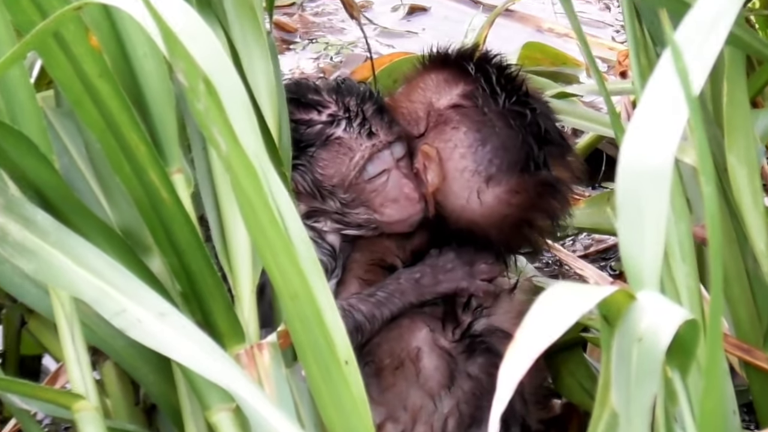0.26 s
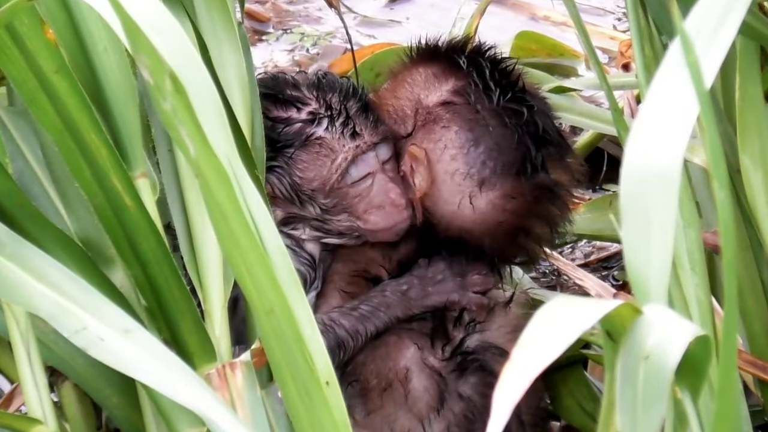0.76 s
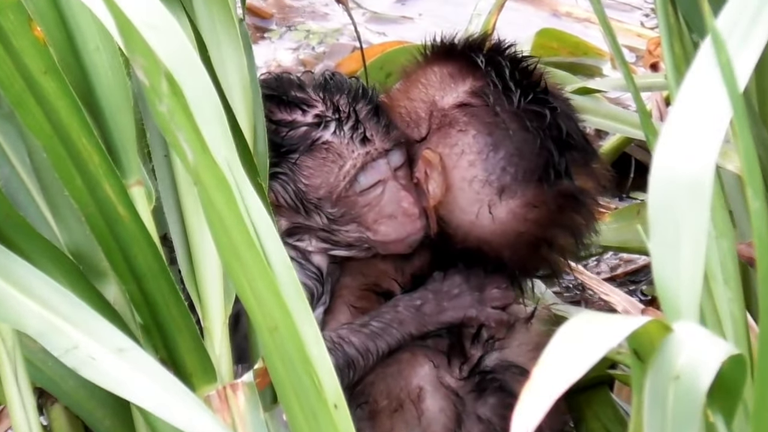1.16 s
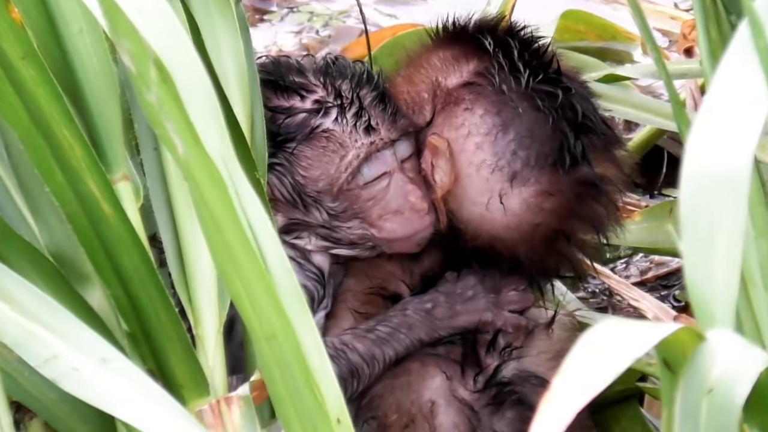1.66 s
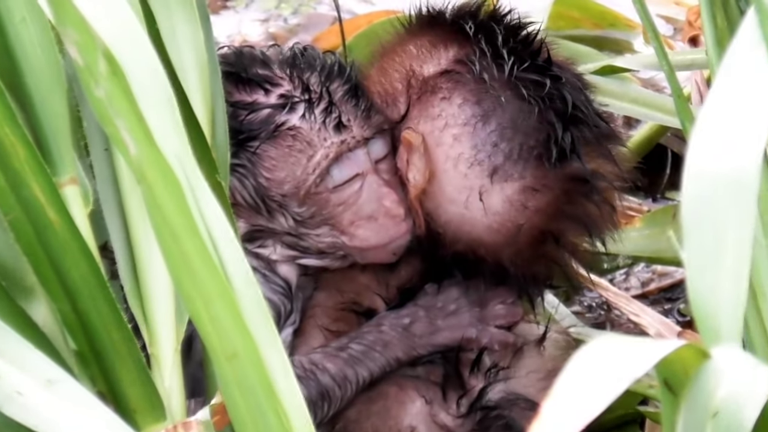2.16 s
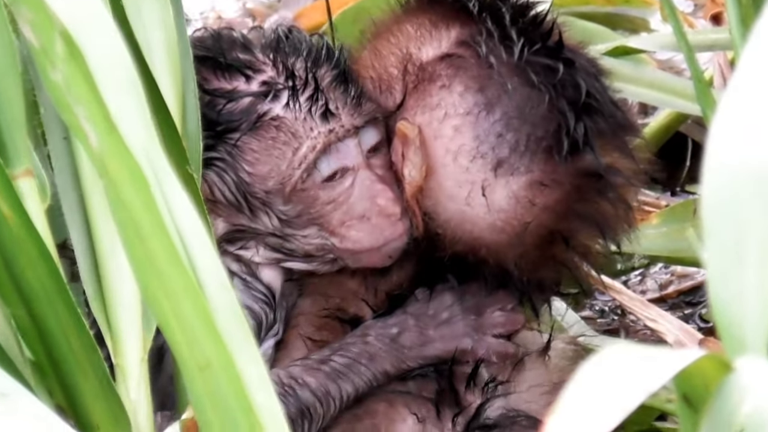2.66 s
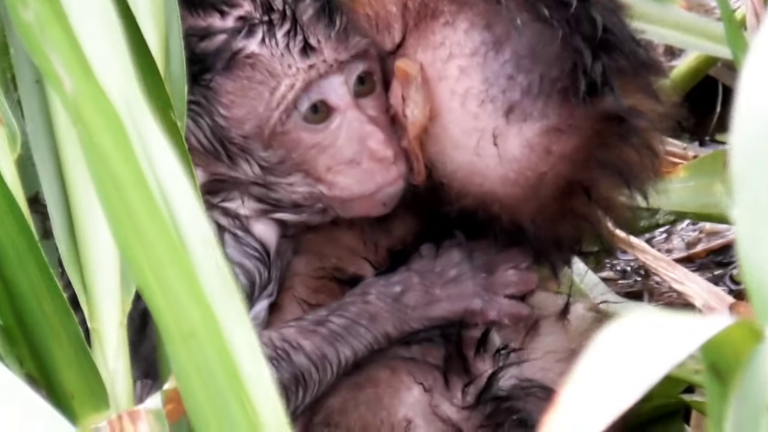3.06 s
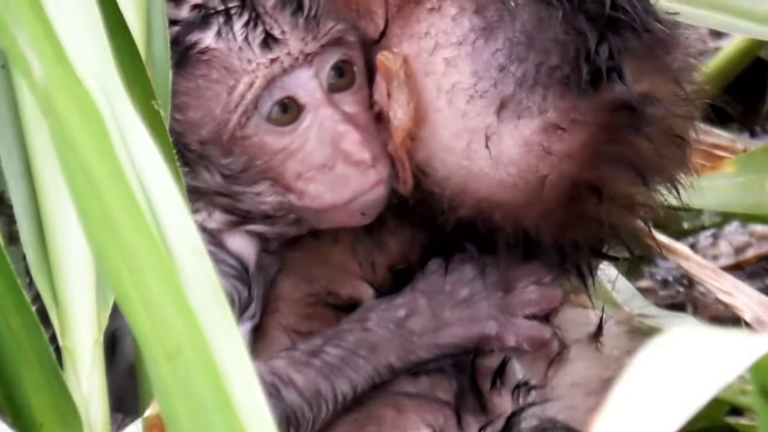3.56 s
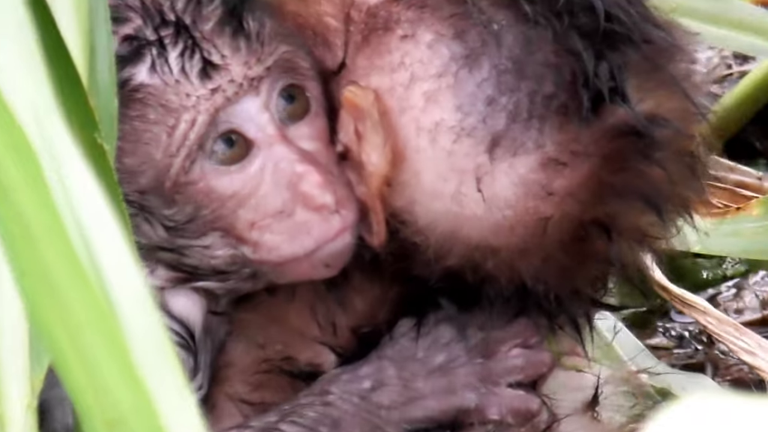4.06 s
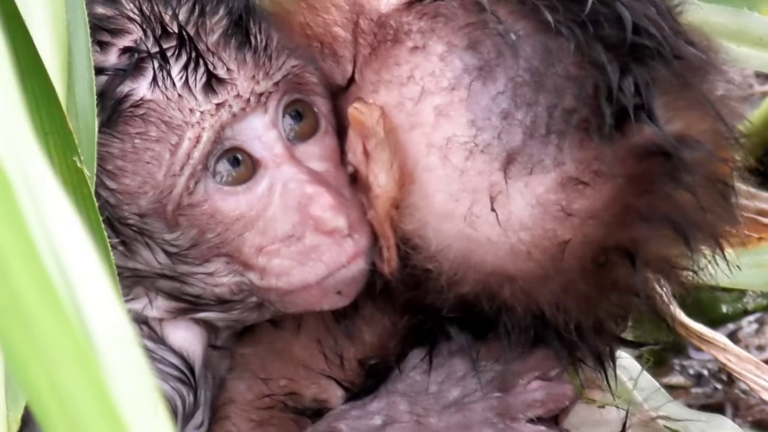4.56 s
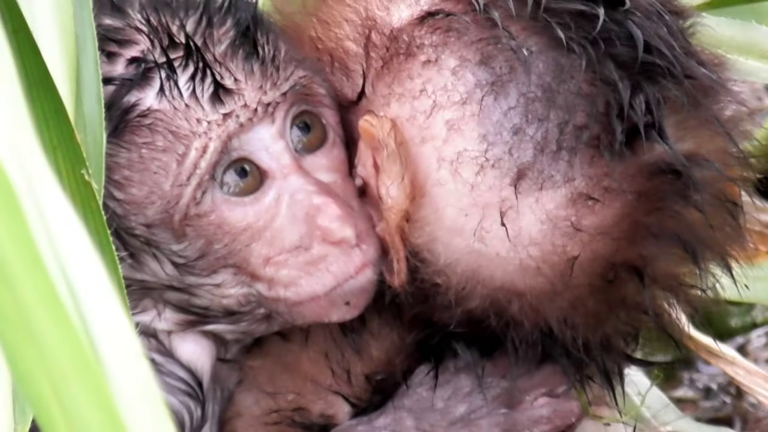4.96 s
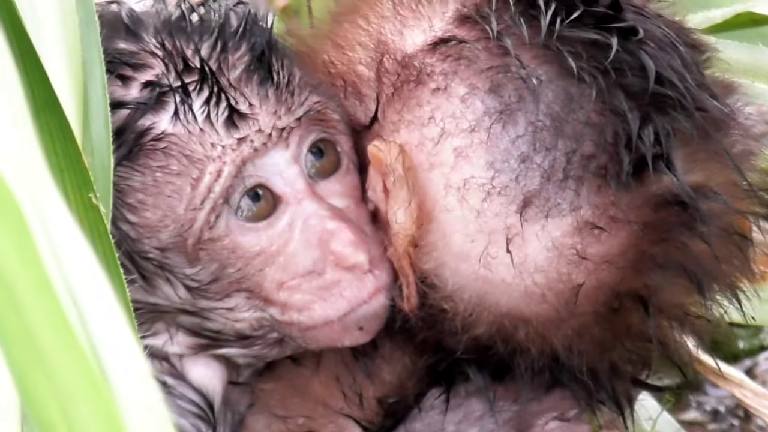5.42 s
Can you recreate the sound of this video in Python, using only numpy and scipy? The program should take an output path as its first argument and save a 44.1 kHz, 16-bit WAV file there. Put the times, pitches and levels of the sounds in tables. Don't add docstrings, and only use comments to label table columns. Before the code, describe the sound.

Infant monkeys give short soft coos over a steady high insect trill, distant birds and a low traffic rumble, ending on one held coo.

```python
import sys
import numpy as np
from scipy import signal
from scipy.fft import rfft, irfft
from scipy.io import wavfile
from scipy.ndimage import uniform_filter1d

SR = 44100
rng = np.random.default_rng(int(sys.argv[2]) if len(sys.argv) > 2 else 0)


def volts(x):
    e = np.asarray(x, float) / 20
    return 10 ** e


def store_pcm(level_fs):
    pcm = np.round(np.clip(level_fs, -1, 1) * 32767).astype(np.int16)
    wavfile.write(sys.argv[1], SR, np.atleast_2d(pcm).T)


N = 250929

# time_s, pitch_hz, fundamental_db
HELD_COO = [(5.3, 912, -58), (5.335, 1008, -52), (5.394, 1012, -57), (5.415, 1050, -51), (5.46, 1080, -43),
            (5.55, 1100, -46.5), (5.585, 1078, -48), (5.655, 1108, -48), (5.69, 1060, -53)]
# time_s, pitch_hz, fundamental_db
DOUBLE_COOS = [
    [(0.245, 853, -74), (0.253, 897, -50.5), (0.259, 937, -61), (0.273, 975, -52.5), (0.329, 923, -60.5),
     (0.381, 1050, -53), (0.409, 1012, -61), (0.425, 944, -61), (0.435, 887, -84)],
    [(0.905, 976, -64), (0.919, 1027, -58), (0.943, 1108, -50), (0.969, 1078, -47.5), (0.989, 1047, -64),
     (1.007, 1025, -58), (1.039, 1120, -51.5), (1.067, 1102, -51), (1.085, 974, -64)],
    [(2.19, 1022, -62), (2.206, 1020, -62), (2.232, 1160, -52), (2.254, 1114, -53), (2.296, 1014, -65),
     (2.328, 1147, -52.5), (2.352, 1117, -52), (2.376, 1062, -69), (2.385, 1094, -80)],
]
# time_s, pitch_hz, fundamental_db
SINGLE_COOS = [
    [(0.0, 1187, -50), (0.03, 1115, -49), (0.045, 1070, -64)],
    [(0.775, 860, -75), (0.795, 945, -62), (0.819, 1011, -55.5), (0.853, 933, -64), (0.862, 893, -72)],
    [(1.372, 954, -74), (1.386, 965, -55.5), (1.41, 973, -67), (1.436, 893, -68)],
    [(1.478, 980, -71), (1.504, 1068, -52.5), (1.52, 1073, -50), (1.528, 1008, -60), (1.548, 957, -68)],
    [(1.588, 924, -73), (1.596, 1000, -67), (1.622, 1110, -49.5), (1.636, 1126, -58), (1.652, 980, -77)],
    [(2.095, 960, -72), (2.115, 975, -63), (2.127, 1009, -64), (2.145, 1025, -61), (2.165, 956, -78)],
]
# start_db, end_db
COO_OVERTONES = [(-60, -58), (-60, -66), (-62, -68), (-63, -63), (-63, -59.5), (-63, -62), (-63, -62),
                 (-66, -68), (-68, -68)]
# freq_hz, gain_db
MOUTH = [(1800, 7), (2000, 1.5), (2150, -8), (2350, -9), (2900, -3.5), (3500, -6.5), (4000, -12),
         (4250, -15), (4500, -23)]
# freq_hz, level_db
HELD_MOUTH = [(1900, -65), (2200, -69), (3050, -86), (3250, -70), (3900, -70), (4400, -70.5)]

# start_s, first_hz, middle_hz, level_db
BARKS = [(0.558, 2700, 2750, -68), (.68, 2540, 2750, -69), (.85, 2620, 2660, -66.5),
         (0.985, 2630, 2570, -58.5), (1.135, 2550, 2770, -62.5), (1.288, 2430, 2783, -61),
         (1.445, 2600, 2780, -63), (1.593, 2350, 2750, -60.5), (1.768, 2600, 2850, -60),
         (1.921, 2540, 2785, -62), (2.04, 2310, 2770, -68), (2.11, 2600, 2750, -61),
         (2.266, 2680, 2750, -59.5), (2.457, 2640, 2790, -65), (2.641, 2710, 2640, -60.5),
         (2.846, 2750, 2620, -61), (3.052, 2590, 2750, -65), (3.096, 2610, 2590, -68),
         (3.267, 2850, 2820, -61), (3.512, 2640, 2620, -62), (3.719, 2750, 2650, -64),
         (3.935, 2700, 2600, -63), (4.139, 2740, 2620, -61), (4.382, 2600, 2740, -62),
         (4.598, 2750, 2650, -60)]
# time_s, length_s, last_hz
BARK_TIRES = [(2.5, .041, 2230), (3.5, .031, 2430)]
# start_s, length_s, first_hz, last_hz, level_db
WARBLE = [(0.422, 0.039, 2700, 2820, -65), (0.756, 0.033, 2750, 2370, -67.5), (1.376, .02, 2150, 2504, -66),
          (1.399, 0.024, 2323, 2680, -57), (1.432, 0.034, 2610, 2230, -57.5),
          (1.686, 0.023, 2070, 2520, -64), (1.709, 0.012, 2830, 2380, -64),
          (1.714, 0.03, 2280, 2680, -58.5), (1.751, 0.03, 2480, 2250, -59), (1.785, 0.022, 2300, 2160, -63),
          (1.555, 0.019, 2290, 2350, -66), (1.572, 0.018, 1950, 1760, -66), (1.882, 0.043, 2480, 2020, -64),
          (1.97, 0.024, 2130, 1990, -63), (1.993, 0.027, 2000, 2280, -63), (2.014, 0.017, 1880, 1950, -65),
          (2.05, .018, 1964, 2160, -64), (2.027, .03, 2230, 2550, -68), (2.06, 0.029, 2443, 2340, -70),
          (2.09, 0.027, 2485, 2060, -60), (2.125, 0.025, 2110, 2350, -65), (2.468, 0.026, 2110, 2400, -62),
          (2.39, 0.025, 2180, 2560, -61), (2.372, 0.019, 1866, 2150, -64), (2.414, 0.018, 2620, 2880, -67),
          (2.428, 0.039, 2620, 2180, -60), (2.744, .025, 2590, 2850, -68), (2.767, 0.054, 3120, 3120, -69),
          (2.8, 0.033, 2540, 2200, -71), (2.835, .016, 2250, 2000, -66), (3.44, 0.0303, 2750, 2350, -71),
          (2.894, 0.029, 2500, 3100, -60.5), (2.923, 0.035, 3070, 3170, -60.5),
          (2.955, 0.032, 3120, 2240, -71), (3.292, 0.026, 2370, 2900, -59), (3.328, 0.035, 3050, 3050, -70),
          (3.352, 0.044, 2710, 2300, -66.5)]
# start_s, length_s, middle_hz, level_db
WHISTLES = [(0.071, 0.046, 1723, -68), (0.164, 0.077, 1470, -62), (0.473, 0.022, 1760, -65),
            (2.151, 0.063, 1340, -65), (2.576, 0.055, 1330, -61.5), (2.6, 0.077, 1600, -65),
            (2.635, .06, 1652, -73), (2.852, 0.046, 1700, -69), (3.689, 0.032, 1790, -69),
            (3.94, 0.093, 1650, -69), (4.05, .045, 1800, -64), (4.384, .06, 1480, -73),
            (2.751, 0.067, 1450, -67), (2.985, 0.069, 1260, -66.5), (3.05, 0.047, 1570, -61),
            (3.102, 0.11, 1580, -64.5), (3.281, 0.075, 1470, -66.5), (3.409, 0.13, 1410, -68.5),
            (3.606, 0.12, 1624, -66), (3.88, 0.097, 1430, -66), (3.986, 0.05, 1506, -63.5),
            (4.2, 0.044, 1645, -68), (4.308, 0.08, 1566, -66), (4.355, 0.061, 1630, -68),
            (4.417, 0.067, 1736, -66), (4.733, 0.015, 1730, -59.5), (4.808, 0.062, 1798, -63.5),
            (5.07, 0.041, 1820, -71), (4.998, 0.038, 1660, -69), (3.354, 0.059, 1690, -68),
            (4.532, 0.049, 1610, -79), (4.628, .07, 1740, -83), (4.94, .07, 1710, -85)]

# time_s, lead_strokes, level_db
CRICKET = [(0, 0.48, -54), (.8, 0.43, -52.5), (1.8, 0.42, -53.5), (2.8, 0.39, -53), (3.8, 0.44, -52.5),
           (4.8, 0.43, -51), (5.7, 0.4, -52)]
# delay_s, length_s, freq_hz, level_db
STROKE = [
    (0, .044, 7628, 0),
    (.029, .034, 7628, -8),
    (.037, .04, 7790, -14),
]
# rasp_number, lag_s
KATYDID_LAG = [(0, .062), (13, .072), (21, .09), (25, .085), (30, .057), (34, .072), (43, .069), (49, .04),
               (53, .036), (63, .055), (72, .056)]
# time_s, level_db
CHORUS = [(0, -59), (2.4, -61.5), (5, -58), (5.7, -61.5)]

# time_s, crack_db, knock_db, crack_hz
TICKS = [(0.0506, -57.5, -64, 3440), (1.7225, -63, -75, 5500), (1.7444, -66, -56, 5000),
         (1.7505, -67, -88, 5700), (1.758, -60, -88, 6100), (1.765, -63.5, -88, 5700),
         (2.0456, -65, -54, 4375), (2.8394, -65, -88, 4180), (4.0497, -63, -88, 5600),
         (4.0881, -57, -66, 3860), (4.2308, -73, -88, 5400), (4.567, -64, -50, 3900),
         (4.588, -65, -75, 4000), (4.7494, -58, -48, 4050), (4.863, -60.5, -71, 3780),
         (5.247, -61, -57, 2380), (5.625, -58.5, -70, 3670)]
# freq_hz, level_db, t60_s
STEM_MODES = [(800, 0.5, 0.075), (1050, -3, 0.018), (1480, -7, .012), (2030, -10, 0.012)]

# time_s, nearness_db
TRAFFIC = [(0, -1.5), (.06, 3.5), (.7, 1), (2.7, 1), (3.9, 1), (4.4, 0.5), (5.7, 0)]
# freq_hz, density_db
RUMBLE = [(12, -53), (20, -24), (70, -1.5), (97, 0), (233, -12), (323, -25), (520, -38.5), (680, -62),
          (1140, -120)]
# freq_hz, width_hz, level_db
DRONES = [(93.2, 27.3, -14), (117.3, 18.5, -11.5), (208, 26, -49), (262.7, 26.4, -24)]
# time_s, freq_hz, level_db
MOTOR = [(0, 691, -82), (.8, 775, -70), (1.6, 761.6, -66), (2.2, 715, -73), (3.5, 645.4, -73),
         (5.7, 629.5, -76)]
# freq_hz, density_db
AIR = [(300, 13.5), (500, -0.5), (800, -4), (1500, -6), (2200, -8.5), (3010, -16), (4310, -16.5),
       (5010, -22.5), (6510, -21.5), (8010, -16.5)]
# freq_hz, density_db
HISS = [(5000, -45), (6500, -1), (8200, -4), (10500, -3.5), (12000, -3), (15500, -10)]
# freq_hz, level_db, t60_s
PUMP_HOUSING = [(1973, -60, 0.018), (1380, -64.5, 0.045)]

# freq_hz, likeness_0_to_1
LIKENESS = [(60, 0.96), (130, 1), (290, 0.71), (640, 0.018), (1300, 0.78), (2500, 0.91), (6800, 0.95),
            (8200, 0.16), (15000, 0.026)]
# freq_hz, level_db
LEFT_LOUDER = [(60, -6), (110, -3.5), (200, -3.5), (380, -1), (700, 3.5), (1290, 1), (2380, -0.5),
               (4400, -1), (8120, -1), (15000, -1)]
# freq_hz, phase_rad
LEFT_LEADS = [(60, .17), (260, .2), (520, .7), (780, .3), (1300, .1), (3000, 0)]


def rms_one(x):
    return x / np.sqrt(np.mean(x ** 2) + 1e-20)


def in_time(rows):
    time_s, *columns = np.transpose(rows)
    return [np.interp(np.arange(N) / SR, time_s, column) for column in columns]


def at_hz(points, hz):
    freq_hz, values = np.array(points)[:, 0], np.array(points)[:, 1]
    return np.interp(np.log(hz), np.log(freq_hz), values)


def drift(rate_hz):
    r = np.exp(-80 * np.pi * rate_hz / SR)
    noise = rng.standard_normal(N // 40 + 2002)
    slow = signal.lfilter([1], [1, -2 * r, r * r], noise)[2000:]
    return np.interp(np.arange(N) / 40, np.arange(len(slow)), rms_one(slow))


def field(spectrum):
    hz = np.maximum(np.fft.rfftfreq(N, 1 / SR), 1)
    mid, side = rfft(rng.standard_normal((2, N)))
    alike = np.clip(at_hz(LIKENESS, hz), 0, 1)
    both = np.sqrt(1 + alike) * mid + np.sqrt(1 - alike) * side * [[1], [-1]]
    halves = np.array([[.5], [-.5]])
    gain = volts(at_hz(spectrum, hz) + at_hz(LEFT_LOUDER, hz) * halves) * (hz > 18)
    gain = gain * np.exp(1j * at_hz(LEFT_LEADS, hz) * halves)
    return rms_one(irfft(both * gain, N))


def resonant_noise(hz, width_hz, channels):
    r = np.exp(-np.pi * width_hz / SR)
    pole = [1, 0, -1, 1, -2 * r * np.cos(2 * np.pi * hz / SR), r * r]
    return rms_one(signal.sosfilt([pole, pole], rng.standard_normal((channels, N))))


def add_note(out, start_s, length_s, first_hz, middle_hz, last_hz, level_db):
    u = np.linspace(-1, 1, round(length_s * SR))
    bow_hz = (first_hz + last_hz) / 2 - middle_hz
    hz = middle_hz + u * (last_hz - first_hz) / 2 + u ** 2 * bow_hz
    at = round(start_s * SR) + np.arange(len(u))
    inside = (at >= 0) & (at < N)
    hump = np.abs(np.cos(np.pi * u / 2)) ** .6
    note = volts(level_db + 2.0) * hump * np.sin(2 * np.pi * (rng.random() + np.cumsum(hz) / SR))
    out[at[inside]] += note[inside]


def placed(x, left_db, lead_s=0):
    both = x * volts(np.array([[left_db / 2], [-left_db / 2]]))
    n = np.arange(N)
    return np.array([both[0], np.interp(n - lead_s * SR, n, both[1])])


def foliage(x, t60_s, wet_db, left_db, lead_s=0):
    t = np.arange(round(t60_s * SR)) / SR
    shared, own = rng.standard_normal((2, 1, len(t)))
    smear = (shared + 0.46 * own * [[1], [-1]]) * volts(-60 * t / t60_s)
    smear = smear / np.sqrt(np.sum(smear ** 2) / 2)
    wet = signal.fftconvolve(x[None], smear, axes=1)[:, :N]
    return placed(x + volts(wet_db) * wet, left_db, lead_s)


def monkeys():
    edge_s, overtones_follow = 0.0055, .55
    t = np.arange(N) / SR
    hz, db = in_time(HELD_COO)
    held = np.clip((t - HELD_COO[0][0]) / 0.01, 0, 1)
    low = volts(db) * held + 1e-12
    pitch = low * hz
    upper = 0
    for coo, (first_db, last_db) in zip(DOUBLE_COOS + SINGLE_COOS, COO_OVERTONES):
        hz, db = in_time(coo)
        start_s, end_s = coo[0][0], coo[-1][0]
        voiced = np.clip(np.minimum(t - start_s, end_s - t) / edge_s + 1, 0, 1) ** 2
        level = volts(db + 3.5) * voiced
        low = low + level
        pitch = pitch + level * hz
        open_db = np.interp(t, [start_s, end_s], [first_db, last_db])
        upper = upper + volts(open_db + overtones_follow * (db - db.max())) * voiced
    hz = uniform_filter1d(pitch / low, size=400)
    phase = 2 * np.pi * np.cumsum(hz * (1 + .004 * drift(45))) / SR
    out = volts(0.5) * uniform_filter1d(low, size=200) * np.sin(phase)
    for k in range(2, 5):
        mouth = upper * volts(at_hz(MOUTH, k * hz)) + held * volts(at_hz(HELD_MOUTH, k * hz))
        out += mouth * volts(3.2 * drift(24)) * np.sin(k * phase)
    return foliage(out, .12, wet_db=-16, left_db=4.3, lead_s=5.4e-5)


def bird(notes, t60_s, wet_db, rasp):
    out = np.zeros(N)
    for note in notes:
        add_note(out, *note)
    chop = (1 + rasp * drift(170)) / np.hypot(1, rasp)
    return foliage(out * chop * volts(1.0 * drift(67)), t60_s, wet_db, left_db=-0.5)


def hoarse_bird():
    time_s, lengths_s, lasts_hz = np.transpose(BARK_TIRES)
    notes = []
    for s, first_hz, middle_hz, db in BARKS:
        length_s, last_hz = np.interp(s, time_s, lengths_s), np.interp(s, time_s, lasts_hz)
        for ratio, voice_db in ((1, 0), (.92, -6)):
            notes.append((s, length_s, ratio * first_hz, ratio * middle_hz, ratio * last_hz,
                          db - 0.5 + voice_db))
    return bird(notes, .12, wet_db=-6, rasp=.8)


def clear_bird():
    rest_hz, bend = 2750, 0.11
    notes = []
    for s, length_s, first_hz, last_hz, db in WARBLE:
        middle_hz = (first_hz + last_hz) / 2 * (1 + bend) - bend * rest_hz
        notes.append((s, length_s, first_hz, middle_hz, last_hz, db))
    return bird(notes, .12, wet_db=-7, rasp=.45)


def far_birds():
    rise_hz_per_s = 5240
    notes = []
    for s, length_s, hz, db in WHISTLES:
        half_rise_hz = rise_hz_per_s * length_s / 2
        notes.append((s, length_s, hz - half_rise_hz, hz, hz + half_rise_hz, db))
    notes.append((.64, .04, 690, 690, 690, -54))
    return bird(notes, .35, wet_db=-3, rasp=.6)


def cricket():
    strokes_per_s = 15.5
    t = np.arange(N) / SR
    lead, db = in_time(CRICKET)
    since_s = ((strokes_per_s * t + lead + .25) % 1 - .25) / strokes_per_s
    out = volts(db - 12.5) * resonant_noise(7660, 150.0, channels=1)[0]
    wander = 2 * np.pi * np.cumsum(8 * drift(10)) / SR
    for delay_s, length_s, hz, tone_db in STROKE:
        away_s = np.minimum(np.abs(since_s - delay_s), np.abs(since_s - delay_s + 1 / strokes_per_s))
        hump = np.cos(np.pi * np.clip(away_s / length_s, 0, .5)) ** 1.4
        level = volts(db + tone_db + 2 + .9 * drift(12))
        out += level * hump * np.sin(2 * np.pi * hz * t + wander)
    return foliage(out * volts(1.8 * drift(250)), .2, wet_db=-13, left_db=1.6, lead_s=6e-6)


def katydid():
    gap_s = .078
    out = np.zeros(N)
    number = np.arange(KATYDID_LAG[-1][0])
    times_s = gap_s * number + np.interp(number, *np.transpose(KATYDID_LAG))
    for s, chance in zip(times_s, rng.normal(0, 1, (len(times_s), 2, 2))):
        for delay_s, (sharp, loud) in zip((-.021, .001), chance):
            off_hz = 60 * sharp
            add_note(out, s + delay_s, .02, 6750 + off_hz, 6950 + off_hz, 7200 + off_hz, -67 + 1.5 * loud)
    blur = volts(-74.0) * resonant_noise(6980, 460.0, channels=1)[0]
    return foliage(out * volts(2.5 * drift(200)) + blur, .1, wet_db=-3, left_db=.8)


def chorus():
    level_db = in_time(CHORUS)[0]
    throb_db = 1.07 * drift(12.0) + 0.63 * drift(37)
    return volts(level_db + throb_db) * resonant_noise(9340, 780.0, channels=2)


def hopper():
    start_s, gap_s, slowing_s = 3.66, .11, .00025
    t = np.arange(N) / SR
    k = np.arange(19)
    times_s = start_s + gap_s * k + slowing_s * k ** 2
    levels_db = -64.5 - 3 * np.maximum(2 - k, 0) + rng.normal(0, 0.95, len(k))
    bursts = sum(volts(db) * np.exp(-((t - s) / 0.034) ** 2) for s, db in zip(times_s, levels_db))
    return placed(bursts * resonant_noise(8730, 450., channels=2), 9.9)


def buzz():
    start_s, end_s, attack_s, release_s = 3.43, 4.1, 0.033, 0.05
    t = np.arange(N) / SR
    on = np.clip(np.minimum((t - start_s) / attack_s, (end_s - t) / release_s), 0, 1)
    out = on * volts(-68.5 + 2.5 * drift(25)) * resonant_noise(3600, 480.0, channels=1)[0]
    return placed(out, 1.5)


def ticks():
    out = np.zeros(N)
    t = np.arange(300) / SR
    for s, crack_db, knock_db, crack_hz in TICKS:
        band = signal.butter(2, [crack_hz / 1.22, crack_hz * 1.22], "band", fs=SR, output="sos")
        grain = volts(crack_db - 60 * t / 0.023) * rng.standard_normal(len(t))
        tick = 4.3 * signal.sosfilt(band, grain)
        stem_db = 2.1 * (knock_db + 48.5) - 41.0
        for hz, mode_db, t60_s in STEM_MODES:
            tick += volts(stem_db + mode_db - 60 * t / t60_s) * np.sin(2 * np.pi * hz * t)
        at = round(s * SR)
        out[at:at + len(t)] += tick
    return placed(out, .1)


def rumble(near_db):
    out = field([(10, -60)] + RUMBLE + [(900, -68)])
    for hz, width_hz, db in DRONES:
        hum = volts(db - near_db * (hz > 200)) * resonant_noise(hz, width_hz, channels=1)
        out += placed(hum, -4.0, lead_s=2.7e-4)
    return volts(-34.5 + near_db - 0.86) * out


def whine(level_db):
    bands = 0.62 * resonant_noise(641, 345.0, channels=2) + 0.6 * resonant_noise(694, 283.0, channels=1)
    out = volts(level_db + 3.0) * bands
    out += volts(level_db - 12.0 + 4.2 * drift(3.3)) * resonant_noise(1379, 64.0, channels=1)
    motor_hz, motor_db = in_time(MOTOR)
    out += volts(motor_db + 2) * drift(35.0) * np.sin(2 * np.pi * np.cumsum(motor_hz) / SR)
    return out


def air_and_hiss(near_db):
    air_db = -78 + 0.49 * near_db
    air = volts(air_db + 19.5 + .8 * drift(8.4)) * field([(200, -57)] + AIR)
    hiss = volts(-73.5 + 2.0 + .5 * drift(19.0)) * field([(3000, -66)] + HISS)
    return air + hiss


def traffic():
    near_db, = in_time(TRAFFIC)
    fade_db_per_s = 1
    whine_db = -63 - fade_db_per_s * np.arange(N) / SR + 1.2 * drift(1.2)
    return rumble(near_db) + whine(whine_db) + air_and_hiss(near_db)


def pump():
    rate_per_s, lead_s, weak_db, uneven_db = 50, .0018, 4, 3.5
    k = np.arange(1, int(N / SR * rate_per_s))
    chance = rng.normal(0, 1, (len(k), len(PUMP_HOUSING), 2))
    t = np.arange(500) / SR
    out = np.zeros(N + len(t))
    at = ((k / rate_per_s - lead_s) * SR).astype(int)[:, None] + np.arange(len(t))
    for m, (hz, db, t60_s) in enumerate(PUMP_HOUSING):
        size = volts(db - weak_db * (k % 2) + uneven_db * chance[:, m, 0])[:, None]
        phase = 2 * chance[:, m, 1][:, None]
        shape = (1 - np.exp(-t / .0008)) * volts(-60 * t / t60_s)
        out[at] += size * shape * np.sin(2 * np.pi * hz * t + phase)
    return placed(out[:N], 0.3)


def scene():
    insects = cricket() + katydid() + (chorus() + hopper()) + buzz()
    animals = monkeys() + (hoarse_bird() + clear_bird() + far_birds()) + insects
    return animals + ticks() + traffic() + pump()


def top_cut(x):
    return signal.sosfilt(signal.butter(12, 16620, fs=SR, output="sos"), x)


def record(dry):
    low_pass = signal.ellip(12, .5, 70, 15520, fs=SR, output="sos")
    mix = signal.sosfilt(low_pass, dry)
    return top_cut(mix)


dry = scene()
out = record(dry)
store_pcm(out)
```